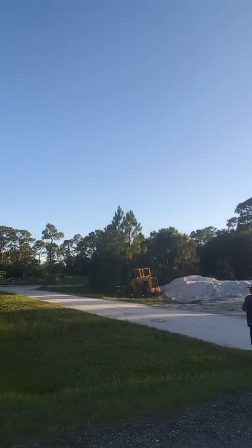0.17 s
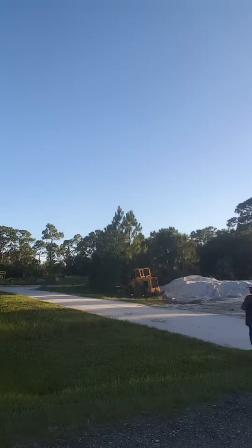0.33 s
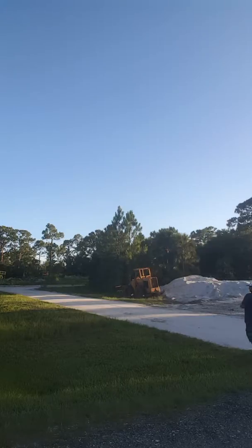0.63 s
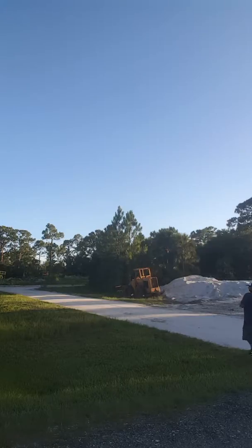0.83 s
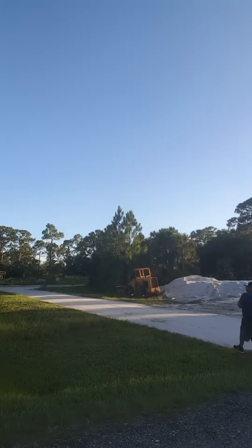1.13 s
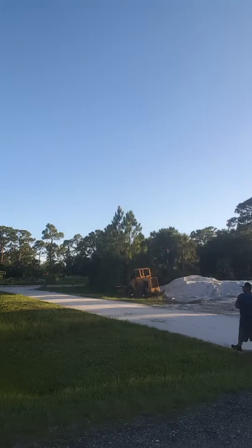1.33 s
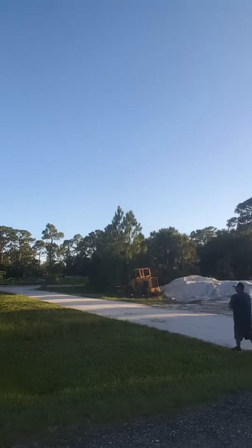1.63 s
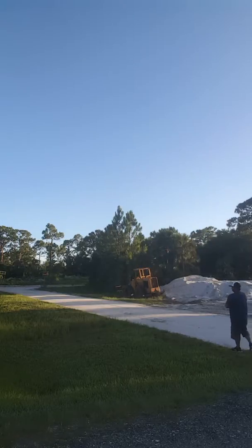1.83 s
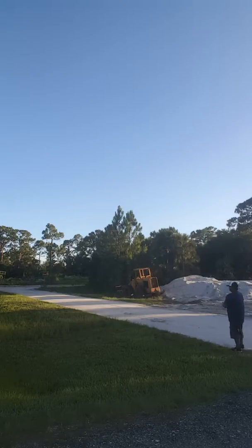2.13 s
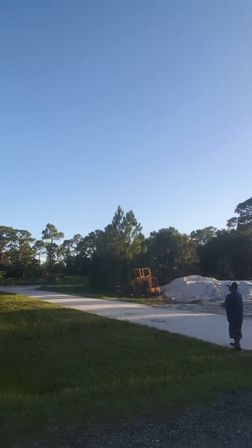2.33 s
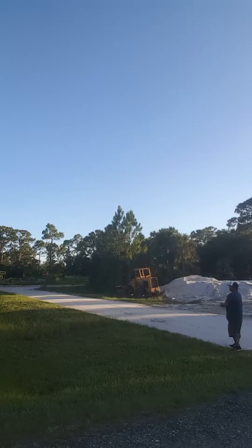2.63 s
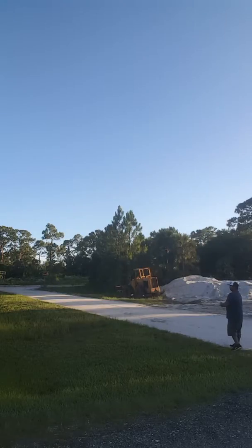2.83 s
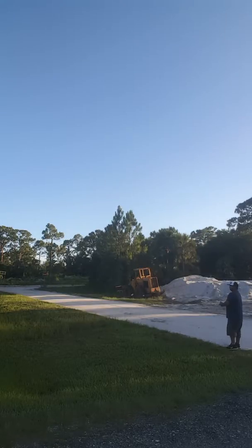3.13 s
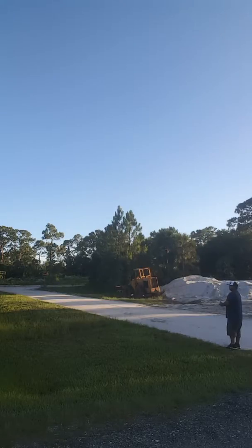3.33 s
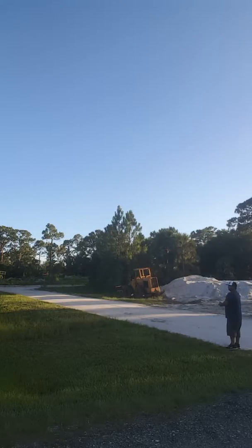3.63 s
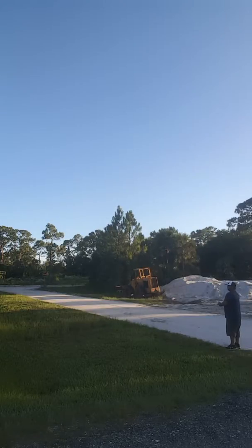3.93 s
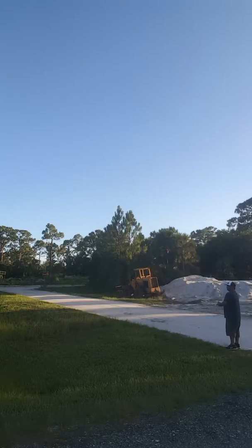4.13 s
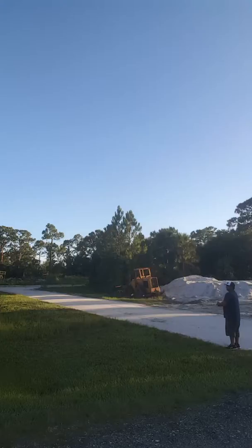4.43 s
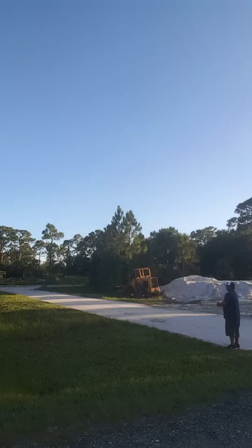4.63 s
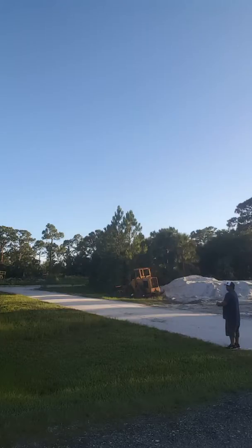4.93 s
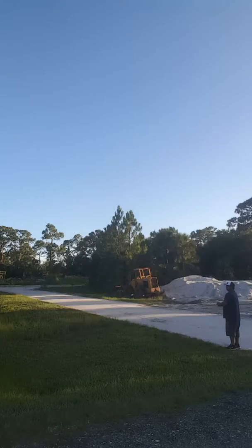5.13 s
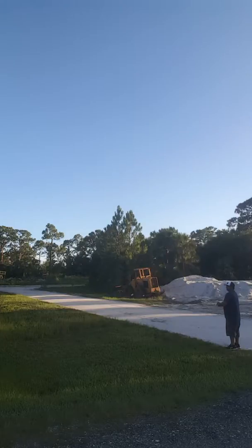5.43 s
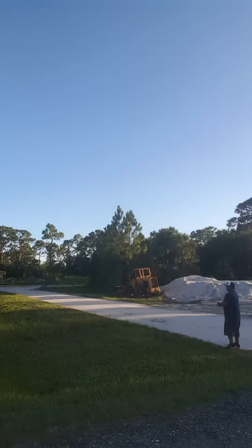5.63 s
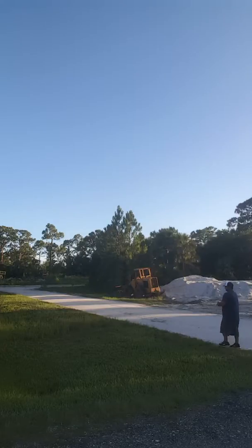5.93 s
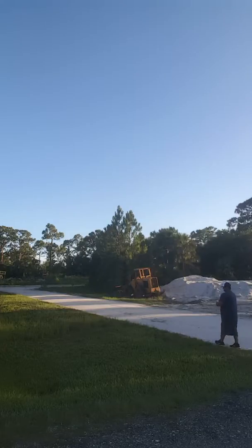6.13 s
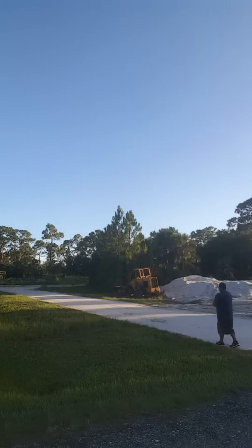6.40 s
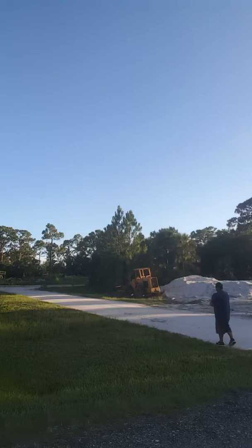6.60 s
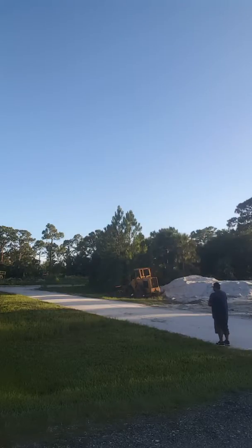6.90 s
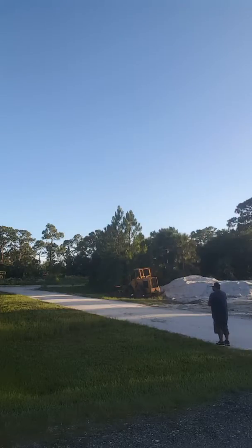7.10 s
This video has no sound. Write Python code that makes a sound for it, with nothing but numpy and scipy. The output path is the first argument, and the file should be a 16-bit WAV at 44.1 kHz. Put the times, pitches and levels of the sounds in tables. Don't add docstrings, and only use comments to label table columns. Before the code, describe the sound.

In an open field edged by trees, a striker on a slate pot makes nine dry, sharp clucks at uneven spacing, getting louder, then six steady hen-like yelps, each breaking from high whistle to low rasp. A pause with soft footsteps follows, then one barely audible cluck. Cicadas pulse and drone, a katydid trills thinly and far birds peep over low breeze rumble. Phone microphone, several steps away, with faint echo from the trees.

```python
import sys
import numpy as np
from scipy import signal
from scipy.fft import rfft, irfft, next_fast_len
from scipy.io import wavfile
from scipy.ndimage import uniform_filter1d, map_coordinates

SR = 44100
rng = np.random.default_rng(int(sys.argv[2]) if len(sys.argv) > 2 else 0)


def dump(signal):
    limited = np.clip(np.atleast_2d(signal).T, -1, 1)
    pcm = np.round(limited * 32767).astype(np.int16)
    wavfile.write(sys.argv[1], SR, pcm)


def ratio(d):
    e = np.asarray(d, float) / 20
    return 10 ** e


N = 320166


def unit(x):
    return x / np.sqrt(np.mean(x ** 2) + 1e-20)


def along(points, hz):
    f, v = np.transpose(points)
    return np.interp(np.log(hz + 1), np.log(f + 1), v)


def curves(rows, t=None):
    s, *cols = np.transpose(rows)
    if t is None:
        t = np.arange(N) / SR
    return [np.interp(t, s, c) for c in cols]


def wobble(rate, size=N):
    knots = rng.standard_normal(int(size * rate / SR) + 4)
    return map_coordinates(knots, [np.arange(size) * rate / SR])


def filtered(x, response):
    m = next_fast_len(x.shape[-1] + SR // 4)
    spectrum = rfft(x, m) * response(np.fft.rfftfreq(m, 1 / SR))
    return irfft(spectrum, m)[..., :x.shape[-1]]


def band(x, centre_hz, width_hz):
    def response(f):
        loss = 1j * f * width_hz
        return (loss / (centre_hz ** 2 - f * f + loss)) ** 2
    return unit(filtered(x, response))


def placed(x, pan_db, lag, shadow=((0, 0),)):
    side = np.array([[.5], [-.5]])

    def port(f):
        return ratio((pan_db + along(shadow, f)) * side) * np.exp(-2j * np.pi * f * lag * side / SR)
    return filtered(np.array([x, x]), port)


# (frequency [Hz], level [dB per Hz])
RUMBLE = [(18, -46), (30, -25.5), (45, -12), (90, -11), (170, -9.5), (300, -14.5), (550, -22), (1000, -23),
          (2000, -27), (3300, -32), (6000, -40), (7700, -42), (10500, -48), (15700, -43)]
# (frequency [Hz], likeness [0-1])
ALIKE = [(25, 0.93), (60, 0.92), (130, .98), (290, 0.95), (640, 0.77), (1400, 0.36), (3100, 0), (15000, 0)]
# (frequency [Hz], width [Hz], level [dB])
HUM = [(84.2, 14, -61), (117.7, 12, -61), (240.2, 8.7, -58)]


def air():
    z = signal.stft(rng.standard_normal((2, N)), nperseg=512)[2]
    patches = uniform_filter1d(rng.standard_normal(z.shape[1:]), 6, 0)
    gusts = unit(uniform_filter1d(patches, 14, 1))
    pair = signal.istft(z * ratio(0.29 * gusts), nperseg=512)[1][:, :N]

    def mid_and_side(hz):
        turn = np.arccos(np.clip(along(ALIKE, hz), -1, 1)) / 2
        return ratio(along(RUMBLE, hz)) * [np.cos(turn), np.sin(turn)]
    mid, side = filtered(pair, mid_and_side)
    rumble = unit(np.array([mid + side, mid - side])) * ratio([[.3], [-.3]])
    hum = np.zeros(N)
    for hz, width_hz, db in HUM:
        tone = 0.042 * np.sin(2 * np.pi * hz * np.arange(N) / SR)
        hum += ratio(db) * band(rng.standard_normal(N) + tone, hz, width_hz)
    return ratio(-54 + .6 * wobble(1.0)) * rumble + hum


def buzz(rate_hz, centre_hz, width_hz, rough, twin_db):
    turns, out, step_hz = np.cumsum(rate_hz) / SR / 2, np.zeros(N), rate_hz[0] / 2
    first = round(np.min(centre_hz - 2 * width_hz) / step_hz)
    last = round(np.max(centre_hz + 2 * width_hz) / step_hz)
    for k in range(first, last):
        near = np.exp(-((k * rate_hz / 2 - centre_hz) / width_hz) ** 2)
        near = ratio(twin_db * (k % 2)) * near
        out += near * (1 - rough + rough * wobble(260)) * np.cos(2 * np.pi * k * turns)
    return unit(out)


# (time [s], level [dB])
DRONE = [(0.0, -77.5), (3.2, -77), (4.2, -72.5), (5.6, -68), (7.26, -72.5)]
# (time of the crest [s], length [s], level [dB])
SWELLS = [
    (0, 0.14, -61),
    (.895, .22, -57.5),
    (1.842, .24, -58.5),
    (2.607, .24, -63.5),
    (3.423, .27, -63),
    (4.278, 0.19, -58),
    (5.215, 0.51, -58),
]


def cicadas():
    t = np.arange(N) / SR
    low_db = np.interp(t, [2.8, 5.8], [-69, -65])
    low_db = low_db + 1.3 * (wobble(2) + wobble(3.6)) + [[-1.5], [1.5]]
    low = ratio(low_db) * band(rng.standard_normal((2, N)), 4580, 960)
    high_db = -76.5 + 1.8 * wobble(2.3) + 1.5 * wobble(5.2) + [[1.5], [-1.5]]
    high = ratio(high_db) * band(rng.standard_normal((2, N)), 6970, 500)

    beat_hz, drone = 295.8 * (1 + .0008 * wobble(4)), ratio(curves(DRONE)[0])
    bright = placed(drone * buzz(beat_hz, 9230, 890, rough=0.54, twin_db=-15), pan_db=9.0, lag=-1.64)
    deep = placed(ratio(1) * drone * buzz(beat_hz, 4900, 400, rough=0.46, twin_db=3.5), pan_db=-6.5, lag=0)

    rest_hz, crest_hz = 4650, 5560
    lift, swell = np.zeros(N), np.zeros(N)
    for s, length, db in SWELLS:
        arch = np.clip(1 - ((t - s) / (length / 2)) ** 2, 0, 1)
        lift += (crest_hz - rest_hz) * arch ** 0.42
        swell += ratio(db - 10.5) * arch ** 0.58
    swell += ratio(-75) * np.clip((5.6 - t) / 2, 0, 1)
    beat_hz = 278.4 * (1 + .001 * wobble(5))
    pulsing = swell * buzz(beat_hz, rest_hz + lift, 300, rough=.33, twin_db=-8)
    return low + high + bright + deep + placed(pulsing, pan_db=-3, lag=0)


def katydid():
    t = np.arange(N) / SR
    strokes_per_s = 69.0
    turn = (strokes_per_s * t + .05) % 1
    db = -79.5 - 0.37 * t + 1.1 * wobble(3)
    stroke = np.sin(np.pi * np.clip(turn / .68, 0, 1)) ** .7
    hz = 9790 - 1000 * turn ** 3 + 25 * wobble(500)
    song = unit(stroke * ratio(1.5 * wobble(330)) * np.sin(2 * np.pi * np.cumsum(hz) / SR))
    return placed(ratio(db) * song, pan_db=21, lag=-5)


# (time [s], length [s], pitch [Hz], level [dB])
BIRDS = [(.19, 0.076, 3740, -77), (.64, 0.081, 3700, -81), (1.09, 0.078, 3860, -80),
         (1.56, 0.12, 3290, -78), (1.94, .11, 3300, -80), (2.22, .074, 3280, -75), (2.39, .1, 3310, -79),
         (2.78, .098, 3370, -76), (2.9, .09, 4320, -80), (3.07, .072, 3260, -79), (3.49, 0.18, 3280, -76),
         (4.16, .08, 3270, -73), (4.25, .12, 4130, -76.5)]


def birds():
    out = np.zeros(N)
    for k, (s, length, mid_hz, db) in enumerate(BIRDS):
        u = np.linspace(0, 1, round(length * SR))
        slide_hz = -310 if k < 3 else -18
        hz = mid_hz + slide_hz * (u - .5) + 45 * wobble(200, size=len(u))
        whistle = np.sin(np.pi * u) ** 0.53 * np.sin(2 * np.pi * np.cumsum(hz) / SR)
        out[round(s * SR):][:len(u)] += ratio(db + 12.5) * whistle
    return placed(out, pan_db=3.5, lag=4.0)


# (time [s], peak level [dB], pitch [Hz], time to fall 60 dB [s])
STEPS = [
    (0.091, -45.5, 1450, .026),
    (6.132, -48, 1080, 0.029),
    (6.172, -51, 1010, 0.035),
    (6.188, -50, 1100, .059),
    (6.461, -50, 1810, 0.029),
    (6.872, -45.5, 1500, 0.34),
]


def steps():
    out, t = np.zeros(N), np.arange(N) / SR
    for s, db, hz, t60 in STEPS:
        u = np.maximum(t - s, 0)
        rise_s, width_hz = 0.00047 + 0.239 * t60 ** 2, hz * (0.59 + 2.8 * t60)
        grit = rng.standard_normal(N) ** 3
        grit[round((s + rise_s) * SR)] += 45
        out += ratio(db - 60 * u / t60) * (1 - np.exp(-u / rise_s)) * band(grit, hz, width_hz)
    return placed(out, pan_db=-2.0, lag=6.2)


# (frequency [Hz], time to fall 60 dB [s])
TREES = [(700, 0.087), (1500, 0.96), (2200, 0.53), (4000, 1)]
# (delay [s], level [dB])
WALLS = [
    (.078, -38.5),
    (.155, -40),
]


def trees():
    hz, t, z = signal.stft(rng.standard_normal((2, SR)), SR, nperseg=256)
    fall = ratio(-60 * t / along(TREES, hz)[:, None])
    tail = signal.istft(z * fall, SR, nperseg=256)[1]
    tail[1] = 0.64 * tail[0] + 0.87 * tail[1]
    tail = ratio(-17.5) * np.pad(tail / np.linalg.norm(tail[0]), ((0, 0), (400, 0)))
    for delay, db in WALLS:
        tail[[0, 1], round(delay * SR) + rng.integers(0, 9, size=2)] += ratio(db + rng.normal(0, 2))
    return tail


# (frequency [Hz], level [dB])
POT = [(300, -64.5), (680, -24.5), (880, -23.5), (1080, -0.5), (1220, -3.5), (1400, -3), (1800, 2),
       (2100, -5), (2350, -27), (2750, -18.5), (3050, -36.5), (3350, -23), (4300, -32.5), (5400, -32),
       (7500, -58.5)]


def pot_ring(size=2048):
    cepstrum = irfft(np.log(ratio(along(POT, np.fft.rfftfreq(size, 1 / SR)))))
    cepstrum[1:size // 2] *= 2
    cepstrum[size // 2 + 1:] = 0
    return irfft(np.exp(rfft(cepstrum)))


TOUCH_HZ, LIFT_HZ = 1039.7, 1038
CLEAN, CALM_SHARE = 0.049, 0.073


def cluck(s, lead, body, db, uneven):
    low, end = s + lead, s + lead + body
    low_hz = 658.4 + 3.5 * max(0, -24 - db)
    crest = min(max(s + 0.0209, low + 0.0072), low + .55 * body)
    steady = min(s + .015, crest - .001)
    fade = max(end - 0.0069, crest + 0.0011)
    fade_db = -11 * min(1, (end - crest) / 0.029)
    even = []
    if steady > low + .003:
        even = [(steady, low_hz, db - 2.5, CALM_SHARE * uneven)]
    return [(s, TOUCH_HZ, db - 18.5, CLEAN),
            (max(low - 0.0072, s + 0.00309), 941.7, db - 2.5, 2 * CLEAN),
            (low, low_hz, db - 4.5, 0.35 * uneven),
            *even,
            (crest, max(700, low_hz), db, uneven),
            (fade, 762.8 - 25, db + fade_db, 0.38 * uneven),
            (end, 762.8, db - 7.5, 0.38 * uneven),
            (end + 0.0072, 970, db - 13.5, 2 * CLEAN),
            (end + 0.0094, LIFT_HZ, db - 15, CLEAN)]


def yelp(s, lead, body, db, uneven, ease_db):
    low, end = s + lead, s + lead + body
    low_hz, rebound_db = 671.4, -7.5
    raspy = s < 4.5
    press_db = 3.5 * raspy
    bounce = []
    break_db = db - 3.5
    if body > .085:
        bounce = [(low + 0.014, 713, db + rebound_db, 0)]
        break_db += rebound_db
    ease_hz = 7 * ease_db
    return [(s, TOUCH_HZ, db - 13.5 + ease_db, CLEAN),
            (s + min(0.0087, lead / 3), 882 - ease_hz, db - 2.5 + ease_db, 0),
            (s + 0.657 * lead, 913 + ease_hz / 2, db - 1 + ease_db / 4, CLEAN),
            (low - 0.0029, 872, db + 3.5 + ease_db / 3, CLEAN),
            (low, low_hz, break_db, 0.62 * uneven),
            *bounce,
            (max(end - 0.0494, low + 0.003), low_hz, db + press_db, uneven * (1 if raspy else CALM_SHARE)),
            (end - .013, 720.6, db - 2.5 + press_db, uneven),
            (end, 770, db - 5.5, CLEAN),
            (end + 0.008, 848, db - 9, 0),
            (end + 0.0096, LIFT_HZ, db - 10.5, CLEAN)]


# (time [s], high lead-in [s], low body [s], crest level [dB], alternation of strong and weak slips [0-1])
CLUCKS = [
    (.258, .014, .032, -24, 1),
    (.435, .008, 0.046, -23, 0.23),
    (0.718, 0.017, 0.025, -20.5, 0.35),
    (1.035, .016, .029, -21, 0.73),
    (1.375, 0.017, 0.027, -22.5, 0.62),
    (1.807, 0.012, 0.034, -20, 0.57),
    (2.3, 0.00825, .026, -19, 0.8),
    (2.973, .012, 0.025, -18.5, 0.66),
    (3.570, 0.011, 0.019, -18, .95),
    (7.227, .008, 0.012, -41.5, 0),
]
# (time [s], high lead-in [s], low body [s], crest level [dB], alternation of strong and weak slips [0-1])
YELPS = [
    (4.027, .042, .070, -26.5, 0.74),
    (4.367, 0.05, 0.063, -23.5, 0.7),
    (4.683, .065, 0.039, -22, 0.31),
    (5.002, 0.051, 0.065, -22.5, 0.52),
    (5.323, .015, 0.1, -24, 0.13),
    (5.659, .054, .069, -23.5, 0.56),
]


def strokes():
    notes = [cluck(*row) for row in CLUCKS]
    for row in YELPS:
        ease_db = -7 * (row in (YELPS[0], YELPS[-1]))
        notes.append(yelp(*row, ease_db))
    return notes


# (time [s], left minus right [dB], lag of the left port [samples], brightness [dB per octave])
WALK = [(.26, -1, 5.9, -2), (.6, .5, 4.6, -1), (1.2, -1.5, 5.8, -1), (1.8, 0.2, 5.9, -1.8),
        (2.3, -0.7, 4.9, 0), (2.98, -1.5, 4.3, -1.5), (3.58, -2.5, 4.2, -2), (4.3, -0.2, 3.6, 0.5),
        (5.7, -0.5, 4.07, -.6), (7.2, -.5, 3.2, -5.5)]
# (frequency [Hz], left minus right [dB])
SHADOW = [(500, 1.5), (900, -5.5), (1500, -1.5), (2400, 0), (4300, -4), (5400, -3.5)]
# (frequency [Hz], level [dB])
HALFWAY = [(340, -14), (1050, -2.5), (1780, 7), (2450, 7), (3200, 18), (5000, -16)]


def slate():
    out, ring = np.zeros((2, N + 2 * SR)), pot_ring()
    order = np.arange(1, 25)[:, None]
    for rows in strokes():
        start = round((rows[0][0] - .0035) * SR)
        size = round((rows[-1][0] + 0.0032) * SR) - start
        slip_hz, level_db, uneven = curves(rows, (start + np.arange(size)) / SR)
        uneven = np.clip(uneven, 0, .98)
        wander = (0.009 + 0.024 * uneven) * wobble(300, size=size)
        slip_hz = uniform_filter1d(slip_hz, size=90) * (1 + wander)

        line_hz = order * slip_hz / 2
        halfway = uneven * ratio(along(HALFWAY, line_hz))
        share = np.where(order % 2, halfway, np.sqrt(1 - uneven ** 2))
        share = share * ratio(-5 * uneven * (line_hz > 2300))
        pan_db, lag, tilt_db = curves(WALK, rows[0][0])
        share = share * ratio(tilt_db * np.clip(np.log2(line_hz / 1700), -1, 1))
        heard = np.sqrt(np.sum((share * ratio(along(POT, line_hz))) ** 2, 0) / 2)

        phase = order * np.pi * np.cumsum(slip_hz) / SR + .8 * (order % 2)
        slips = np.sum(share * np.cos(phase), 0)
        slips = slips * ratio((.5 + 1.6 * uneven) * wobble(520, size=size))
        slips = slips + (.1 + .35 * uneven) * rng.standard_normal(size)
        edges = signal.windows.tukey(size, 380 / size)
        level = ratio(level_db) / uniform_filter1d(heard, size=60)
        note = signal.fftconvolve(slips * edges * level, ring)
        out[:, start:start + len(note)] += placed(ratio(-1.16) * note, pan_db, lag, SHADOW)
        echo = signal.fftconvolve(note[None], trees(), axes=1)
        out[:, start:start + echo.shape[1]] += echo
    return out[:, :N]


def scene():
    return slate() + air() + cicadas() + katydid() + birds() + steps()


def low_pass(x):
    return signal.sosfilt(signal.butter(12, 15750, fs=SR, output="sos"), x)


def record(dry):
    limited = filtered(dry, lambda hz: hz < 15750)
    return low_pass(limited - .0006)


dry = scene()
out = record(dry)
dump(out)
```